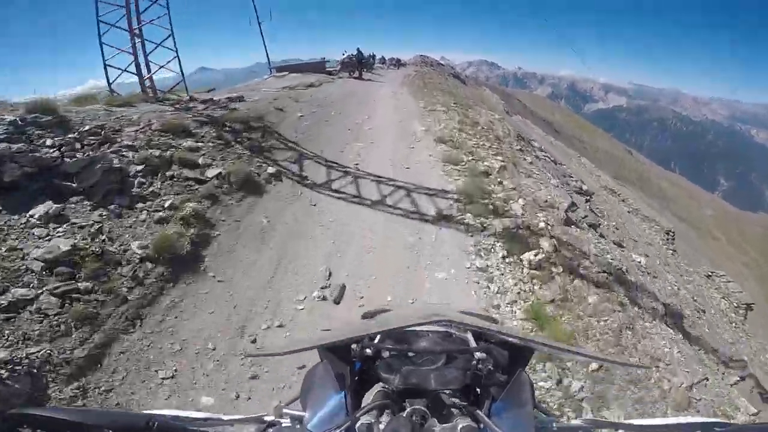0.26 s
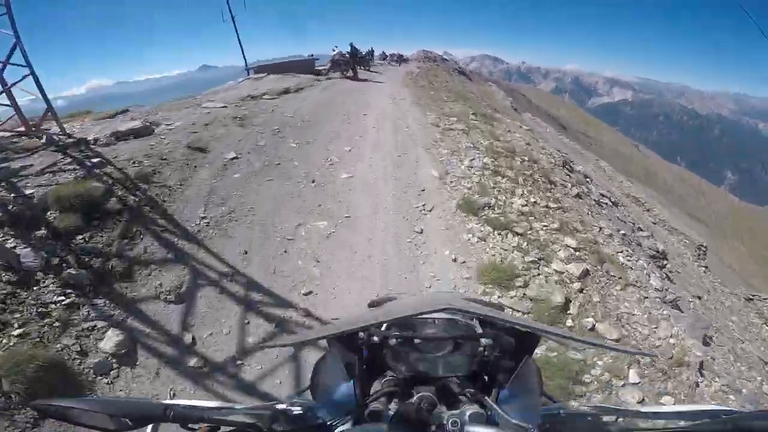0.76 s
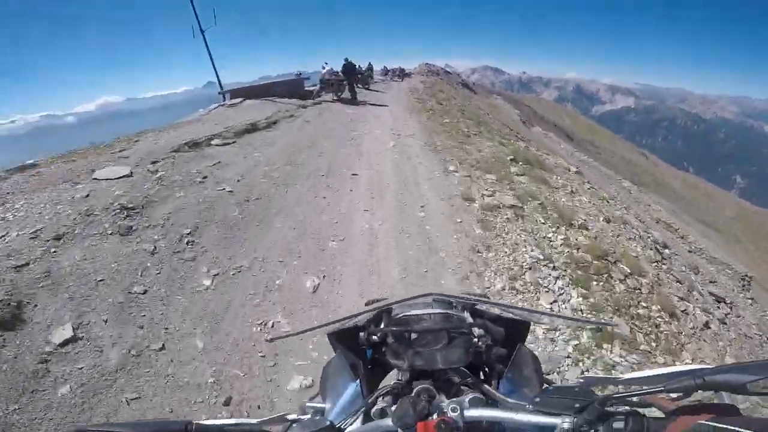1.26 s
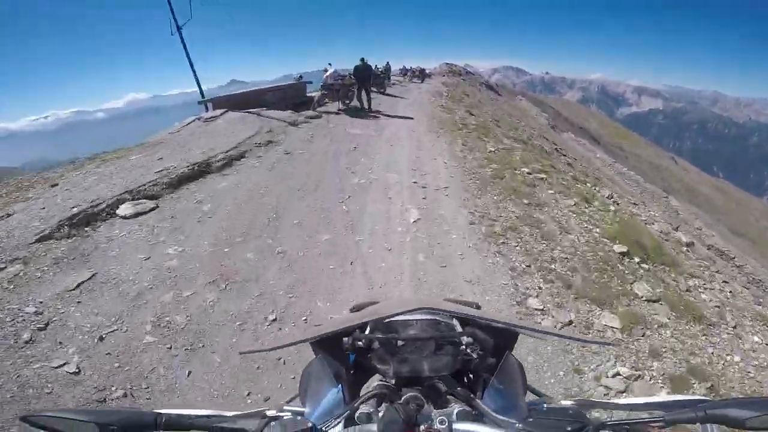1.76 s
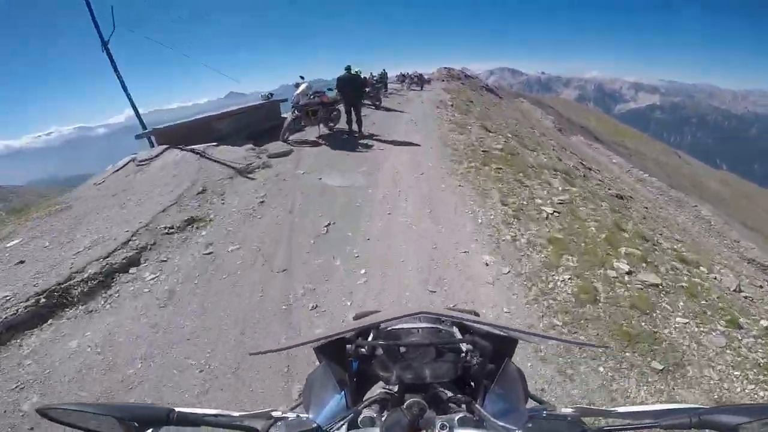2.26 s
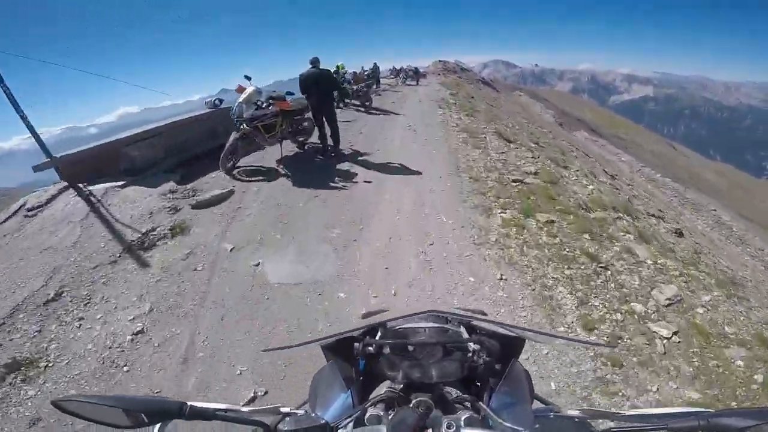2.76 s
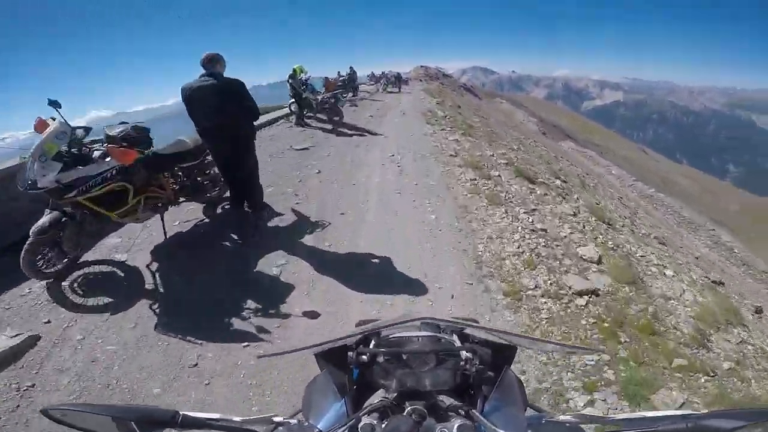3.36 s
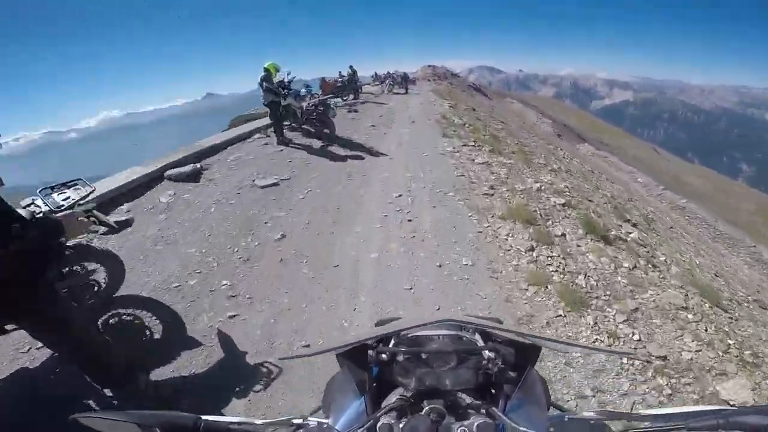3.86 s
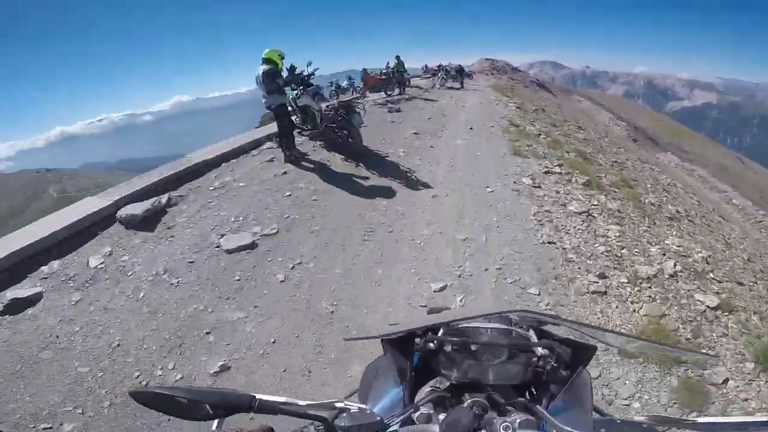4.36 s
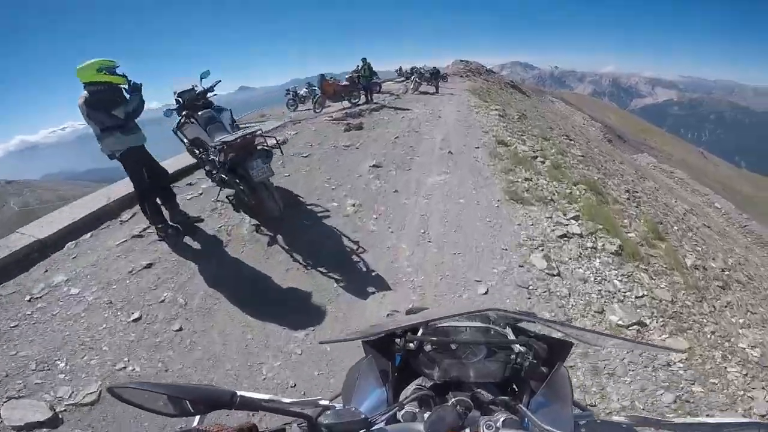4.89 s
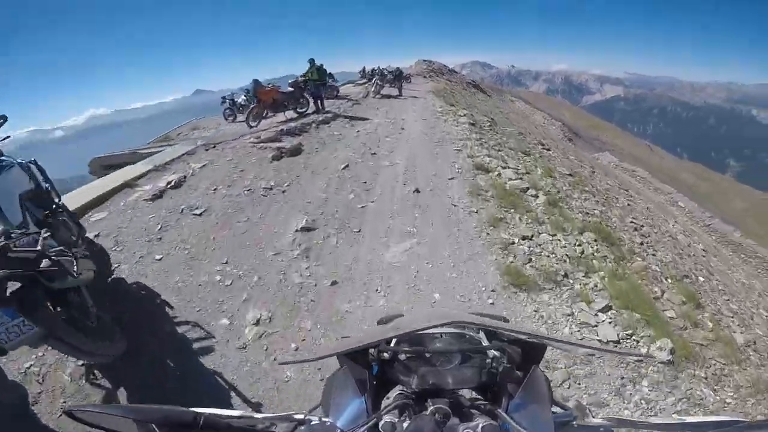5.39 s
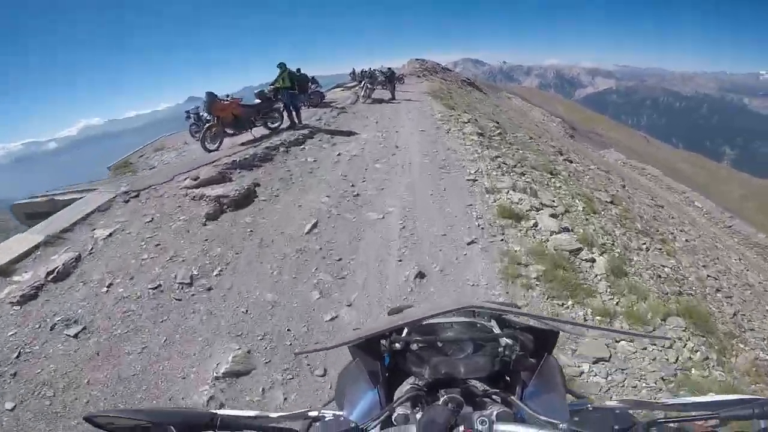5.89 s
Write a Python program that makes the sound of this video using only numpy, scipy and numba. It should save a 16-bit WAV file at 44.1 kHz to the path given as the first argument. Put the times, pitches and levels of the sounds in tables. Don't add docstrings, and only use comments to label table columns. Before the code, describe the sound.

A deep, pulsing motorcycle exhaust pulls up a stony open ridge, heard on board from a microphone at the rider's chest. It begins fast and barking with bright stone pings, lurching as the wheel slips. After a sharp clunk underneath, the revs fall into slow separate thuds, with mechanical clatter, gravel crunch and a thin, wavering gear whine. Near the end the revs rise modestly and hold over soft wind buffeting.

```python
import sys
import numpy as np
from scipy import signal
from scipy.fft import rfft, irfft, next_fast_len
from scipy.io import wavfile
from scipy.ndimage import uniform_filter1d
from numba import njit

SR = 44100
rng = np.random.default_rng(int(sys.argv[2]) if len(sys.argv) > 2 else 0)


def invert_db(x):
    u = np.asarray(x, float) / 20
    return 10 ** u


def transcribe(u):
    v = np.clip(np.atleast_2d(u).T, -1, 1)
    q = np.round(v * 32767).astype(np.int16)
    wavfile.write(sys.argv[1], SR, q)


N = 270333

# t/s, f/Hz (turns)
CRANK_SPEED = [(0, 31.25), (.25, 30.19), (.51, 32.3), (1.298, 32.12), (1.486, 31.48), (1.92, 30.83),
               (1.968, 27.6), (2.298, 25.32), (2.715, 24.11), (3.09, 23.33), (3.283, 21.84), (3.515, 21.65),
               (3.866, 20.33), (4.74, 20.69), (5.113, 20.69), (5.429, 25.14), (5.58, 25.71), (6.136, 25.48)]
# t/s, gain f/Hz (turns), half length t/s
LURCHES = [(.133, 4.5, .061), (.446, 1.81, .065), (.93, 1.67, .042), (1.087, 1.08, .029),
           (1.433, 2.19, .035), (1.75, .67, .055), (2.423, .53, .055), (3.109, -1.33, .05),
           (3.457, .86, .065), (4.069, -.63, .028), (4.311, .24, .035), (4.921, -.45, .065)]
# t/s, load level/dB
THROTTLE = [(0, 1), (.5, -0.8), (1.3, -0.5), (1.825, 0), (1.86, 0), (2.15, -4.5), (2.5, -4), (3.08, -4.5),
            (3.2, -3), (3.5, -2), (3.65, -3.5), (4.08, -2), (4.18, -2), (5.08, -2), (5.27, -0.5),
            (5.5, -1.8), (6.13, -1.5)]
# f/Hz (turns), pumping level/dB, bark level/dB re firing, rocking level/dB
ENGINE_BY_REVS = [
    (21.5, -24, -15, -59),
    (22, -23, -13, -37),
    (24, -21.5, -10, -35),
    (25.8, -22.5, -9.5, -42),
    (32.3, -20, -7, -26),
]
# f/Hz (turns), level/dB re firing
RASP_BY_REVS = [
    (20.6, -33.5),
    (23.8, -39.5),
    (25.6, -42),
    (31.8, -28.5),
]
# t/s, depth level/dB, half length t/s
STUMBLES = [
    (1.905, -6, .035),
    (2.022, -14, .015),
    (3.08, -3, .04),
    (4.08, -4, .05),
]
# t/s, f/Hz, level/dB
WHINE = [(0, 516, -43), (1.8, 520, -49.5), (1.93, 590, -52), (2.0, 582, -40), (2.1, 561, -41.5),
         (2.45, 531.6, -43.5), (2.7, 501, -43), (3.1, 487.5, -38.5), (3.45, 473.6, -43), (3.75, 454, -47.5),
         (3.95, 436.5, -50.5), (4.7, 448.4, -48), (5.1, 462.7, -48.5), (5.3, 499, -39), (5.42, 554, -47),
         (5.7, 544, -43.5), (6.13, 528, -47)]
# share of the two-turn cycle [1], strength level/dB, fade t/ms
VALVES = [
    (.245, 0, 12),
    (.40, -5, 4),
    (.55, -7, 5),
    (.755, -3.5, 7),
    (.93, -8, 5),
    (.09, -9, 5),
]
# f/Hz, level/dB per Hz
CASING = [(250, -10), (340, -15), (500, -8), (720, -12.5), (950, -8.5), (2150, -16), (2550, -20),
          (5500, -27), (7000, -26.5), (8000, -35.5), (10000, -39.5), (11200, -47.5), (13200, -49.5),
          (15000, -56)]
# f/Hz, width f/Hz, level/dB, rise level/dB per turn a second
CASING_MODES = [
    (644.4, 87, -12.5, .5),
    (970, 140, -7, 0.03),
    (1512, 115, -7.5, -0.02),
    (2026, 105, -12.5, 0.29),
    (3923, 210, -19.5, -0.03),
    (4507, 72, -24.5, -0.4),
    (5100, 130, -27.5, 0),
    (6250, 600, -21.5, 0),
    (10000, 200, -42, 0.5),
]
# t/s, peak level/dB, ring f/Hz, broad crack level/dB re ping
PINGS = [(0.0, -30, 3340, -27), (0.0345, -17.5, 5100, -18), (0.077, -26, 5450, -15),
         (0.0964, -33, 5100, -12), (0.015, -33, 3500, -21), (0.114, -17, 5150, -19.5),
         (0.13, -38, 4050, -15), (1.364, -21, 4660, -28), (1.5732, -31, 2709, -32),
         (2.6625, -45, 3800, -25), (3.085, -35, 4635, -36)]
# t/s,
# peak level/dB, ring f/Hz, fade t/ms
KNOCKS = [(1.7926, -7.5, 870, .7), (1.7926, -19, 700, 2.), (1.7960, -20, 800, 1.3), (1.7928, -25, 1500, .6),
          (1.8035, -26, 1550, .6), (1.8037, -14, 900, .9), (.5122, -12.5, 1300, .28),
          (1.7985, -20, 950, 1.2), (1.8135, -24, 800, 1.), (1.895, -26, 1500, 1.2), (1.930, -26, 1700, 1.2),
          (1.9995, -31, 1200, 1.2), (.833, -24, 1500, 1.), (.894, -26, 1000, 1.), (1.199, -23, 1060, 1.),
          (1.324, -23, 985, 1.), (.0364, -24, 5200, .4), (.0415, -27, 3000, .5), (.0795, -28, 5200, .4),
          (.098, -27, 4200, .5), (.1152, -23, 5400, .3), (.116, -21, 4000, .4), (.132, -28, 3000, .4)]

FIRST_TURN = 1.57
FIRE_DB, BARK_DB_PER_LOAD_DB = -21, -0.63
RASP_HZ, RASP_WIDTH_HZ = 370.5, 45
SIDE_BRANCH_HZ, SIDE_BRANCH_WIDTH_HZ, SIDE_BRANCH_SHARE = 164, 32, .62
WHINE_WIDTH_HZ = 26.
PUMP_GEAR_ORDER, PUMP_GEAR_WIDTH_HZ, PUMP_GEAR_DB = 61., 97, -46.5
# level/dB at 20 turns a second, rise level/dB per turn a second, opening spray level/dB
CLATTER_MID, CLATTER_TOP, CLATTER_LOW = (-34.5, 0.25, 3.7), (-43.5, 0.32, 2.9), (-36.5, 0.34, 2.4)
SPRAY_ENDS_S, SPRAY_FADE_S = 0.16, 0.025
WIND_DB = -34


def level(x, db):
    return x * invert_db(db) / np.sqrt(np.mean(x ** 2))


def curves(table):
    s, *columns = np.transpose(table)
    return [np.interp(np.arange(N) / SR, s, c) for c in columns]


def by_revs(table, hz):
    revs, *columns = np.transpose(table)
    return [np.interp(hz, revs, c) for c in columns]


@njit
def svf(x, hz, width):
    y, b, l = np.empty(len(x)), 0., 0.
    for i in range(len(x)):
        g, k = np.tan(np.pi * hz[i] / SR), width / hz[i]
        v = (b + g * (x[i] - l)) / (1 + g * (g + k))
        b, l, y[i] = 2 * v - b, l + 2 * g * v, k * v
    return y


def band(x, hz, width):
    return svf(x, np.full(len(x), 1. * hz), 1. * width)


def cut(x, hz, kind, order=2):
    return signal.sosfilt(signal.butter(order, hz, kind, fs=SR, output="sos"), x)


def colour(x, points):
    hz, db = np.transpose(points)
    size = next_fast_len(len(x))
    bins_hz = np.arange(size // 2 + 1) * SR / size
    gain = invert_db(np.interp(np.log(bins_hz + 1), np.log(hz), db))
    return irfft(rfft(x, size) * gain, size)[:len(x)]


def walk(rate):
    k = max(int(SR / rate), N // 399)
    held = np.repeat(rng.standard_normal(size=400), k)[:N]
    return 0.78 * uniform_filter1d(uniform_filter1d(held, k), k)


def steady(x, seconds=.3):
    return x / np.sqrt(uniform_filter1d(x ** 2, int(seconds * SR)) + 1e-12)


def crank_passes(turns, share):
    count = (turns + 1 - share).astype(int)
    return np.diff(count, prepend=count[0]) > 0


def engine(turns, hz, load_db):
    pump_db, bark_db, rock_db = by_revs(ENGINE_BY_REVS, hz)
    t = np.arange(N) / SR
    stumble_db = sum(db * np.exp(-((t - s) / half) ** 2) for s, db, half in STUMBLES)
    fire_db = FIRE_DB + load_db + .5 * stumble_db
    bark_db = bark_db + BARK_DB_PER_LOAD_DB * load_db

    whole = turns.astype(int)
    scatter = rng.standard_normal((400, 2))
    fired = crank_passes(turns, 0)
    stroke_db = .7 * scatter[whole, 0] + .5 * (whole % 2)
    pulses = cut(fired * invert_db(stroke_db), 270, "low", order=5)
    ring = steady(band(pulses, 100.7, 36))
    ring = ring - .62 * steady(cut(band(pulses, 59.5, 16), 71, "low"))

    turned_db = 1.5 * scatter[whole, 1] - 1.3 * np.minimum(load_db + 3, 0)
    turned = crank_passes(turns, .536) * invert_db(turned_db)
    early = crank_passes(turns, .39) * (20.5 / hz) ** 4 * invert_db(2.5 * scatter[whole + 1, 1])
    back = cut(turned + .5 * early, 270, "low", order=5)
    bark = steady(svf(pulses + 1.1 * back, 177 + 2.15 * hz, 54.)) * invert_db(.9 * walk(30))

    struck = fired * invert_db(2 * scatter[whole + 2, 0]) + .8 * turned * invert_db(-4 * (whole % 2))
    rasp = band(band(struck, RASP_HZ, RASP_WIDTH_HZ), RASP_HZ, 2 * RASP_WIDTH_HZ)
    rasp = steady(rasp) * invert_db(by_revs(RASP_BY_REVS, hz)[0])
    flutter = steady(band(band(rng.standard_normal(N), 238, 160), 140, 170))
    exhaust = ring + rasp * invert_db(-load_db) + invert_db(bark_db) * (bark + invert_db(-8) * flutter)

    angle = 2 * np.pi * (turns - .0099 * hz)
    push = np.exp(.87 * np.cos(2 * angle)) - np.i0(.87)
    push = steady(push * invert_db(.7 * walk(27)))
    pump_db = pump_db + stumble_db * (.5 + .5 * np.cos(angle))
    rock = np.sqrt(2) * np.cos(2 * np.pi * turns - 5.)

    whole_note = invert_db(pump_db) * push + invert_db(rock_db) * rock + invert_db(fire_db) * exhaust
    return whole_note - SIDE_BRANCH_SHARE * band(whole_note, SIDE_BRANCH_HZ, SIDE_BRANCH_WIDTH_HZ)


def whine(turns, hz):
    mesh_hz, mesh_db = curves(WHINE)
    phase = 2 * np.pi * np.cumsum(mesh_hz) / SR + 1.4 * walk(30) + .9 * np.sin(np.pi * turns)
    waver_db = 2.2 * walk(18) + 4 * np.cos(np.pi * turns - 1.3)
    line = np.sqrt(2) * np.sin(phase) * invert_db(waver_db)
    smear = svf(rng.standard_normal(N), mesh_hz, WHINE_WIDTH_HZ)
    whir = svf(rng.standard_normal(N), PUMP_GEAR_ORDER * hz, PUMP_GEAR_WIDTH_HZ)
    clean = np.clip((31 - hz) / 3, .25, 1)
    mesh = clean * line + level(smear, -9) / clean
    return invert_db(mesh_db) * mesh + level(whir, PUMP_GEAR_DB)


def valve_beats(turns, hz):
    chance = rng.standard_normal((200, len(VALVES)))
    beat = 0
    for k, (share, db, fade_ms) in enumerate(VALVES):
        cycle = turns / 2 - share + 1
        since_ms = (cycle % 1) * 2000 / hz
        beat = beat + invert_db(db + .7 * chance[cycle.astype(int), k]) * np.exp(-since_ms / fade_ms)
    contrast = (21 / hz) ** 1.3
    return uniform_filter1d(beat, 110) * contrast, uniform_filter1d(beat, 380) * contrast


def clatter(turns, hz):
    crisp, beat = valve_beats(turns, hz)
    rattle = rng.standard_normal(N) * (1 + beat) * invert_db(.6 * walk(12))
    grain_db = 3.0 * np.minimum(rng.exponential(size=N), 1.5)
    grains = (rng.random(N) < 400 / SR) * rng.standard_normal(N) * invert_db(grain_db)
    crunch = level(uniform_filter1d(grains, size=5), -17)
    body = level(colour(level(rattle, 0) + crunch, CASING), 0)

    ticks = (rng.random(N) < 3000 / SR) * np.clip(rng.standard_normal(N), -1.2, 1.2)
    for mode_hz, width, db, rise in CASING_MODES:
        shaken = ticks * (.12 + crisp if mode_hz < 4700 else .25 + beat)
        mode = band(band(shaken, mode_hz, width), mode_hz, 3 * width)
        body = body + level(mode, db) * invert_db(rise * (hz - 26.5))

    spray = .5 - .5 * np.tanh((np.arange(N) / SR - SPRAY_ENDS_S) / SPRAY_FADE_S)
    mid_db, top_db, low_db = (db + per_hz * (hz - 20) + spray_db * spray
                              for db, per_hz, spray_db in (CLATTER_MID, CLATTER_TOP, CLATTER_LOW))
    low = cut(body, 784, "low", order=3)
    mid = cut(cut(body, 698, "high", order=3), 2730, "low", order=3)
    top = cut(body, 2930, "high", order=3)
    out = level(mid, 0.99) * invert_db(mid_db)
    out = out + level(top, 1) * invert_db(top_db + .5 * walk(12))
    return out + level(low, -0.12) * invert_db(low_db + 1.9 * walk(19))


def stones():
    out, t = np.zeros(N + 2048), np.arange(2048) / SR
    for s, db, hz, crack_db in PINGS:
        scrape = rng.standard_normal(2048) * (t / .0035) * np.exp(1 - t / .0035)
        crack = band(band(scrape, 6000, 4000), 7650, 3300)
        ping = band(band(scrape, hz, 1300), hz, 4200) + invert_db(crack_db + 9.5) * crack
        out[int(s * SR):][:2048] += invert_db(db) * ping / np.abs(ping).max()
    for s, db, hz, fade_ms in KNOCKS:
        swing = 1000 * t / fade_ms
        out[int(s * SR):][:2048] -= invert_db(db) * np.sin(2 * np.pi * hz * t) * swing * np.exp(1 - swing)
    return out[:N]


def wind():
    gusts = band(band(rng.standard_normal(N), 12, 10), 12, 14) * invert_db(3.0 * walk(3))
    bumps = band(band(rng.standard_normal(N), 90, 100), 90, 100)
    return level(gusts, WIND_DB) + level(bumps, WIND_DB - 6)


def scene():
    t = np.arange(N) / SR
    lurch_hz = sum(gain_hz * np.exp(-((t - s) / half) ** 2) for s, gain_hz, half in LURCHES)
    hz = curves(CRANK_SPEED)[0] + lurch_hz
    load_db = curves(THROTTLE)[0]
    turns = FIRST_TURN + np.cumsum(hz) / SR
    mix = engine(turns, hz, load_db) + whine(turns, hz) + clatter(turns, hz) + stones() + wind()
    return mix[None]


def low_pass(x):
    return signal.sosfilt(signal.butter(12, 15090, fs=SR, output="sos"), x)


def record(dry):
    fade = np.minimum((N - np.arange(N)) / (.008 * SR), 1)
    mix = cut(dry, 14000, "low", order=8) * fade
    return low_pass(mix)


dry = scene()
out = record(dry)
transcribe(out)
```